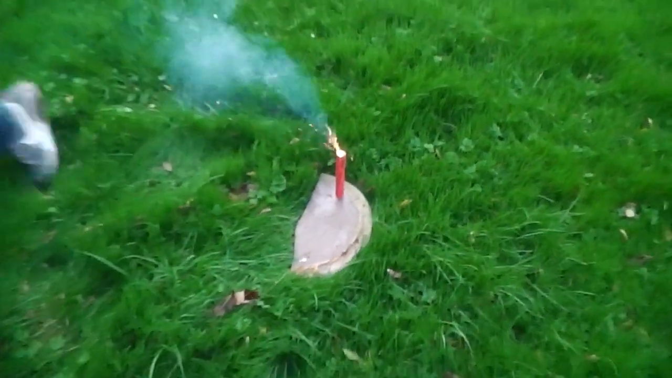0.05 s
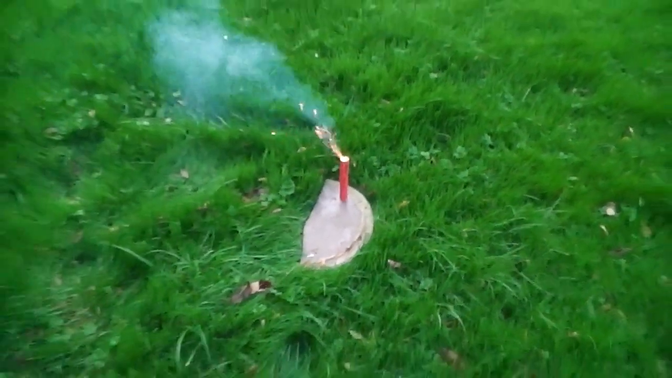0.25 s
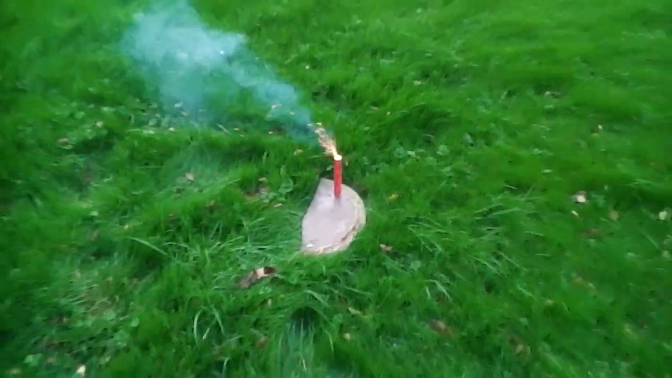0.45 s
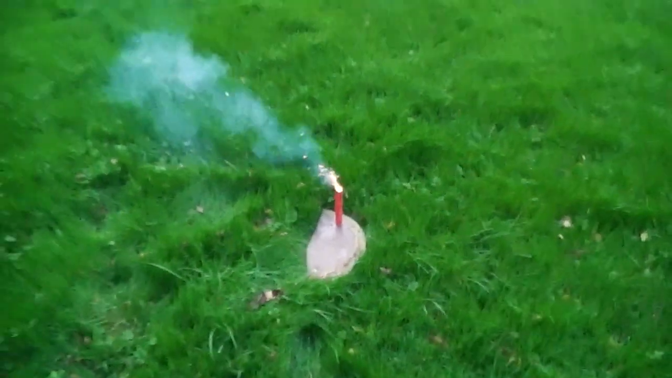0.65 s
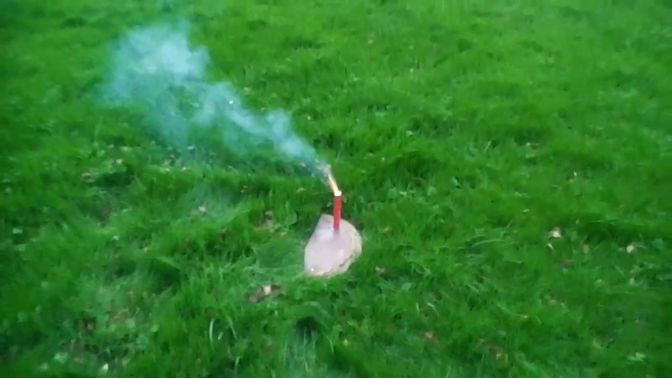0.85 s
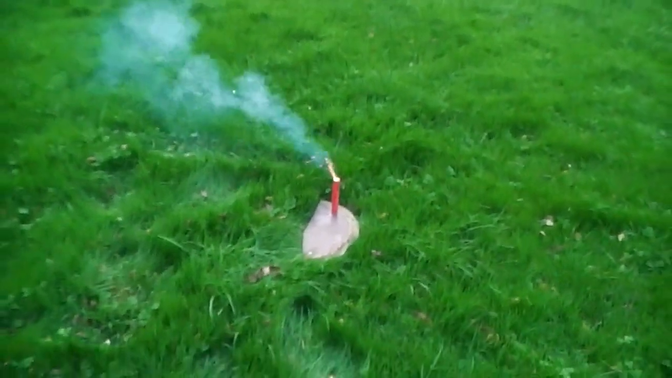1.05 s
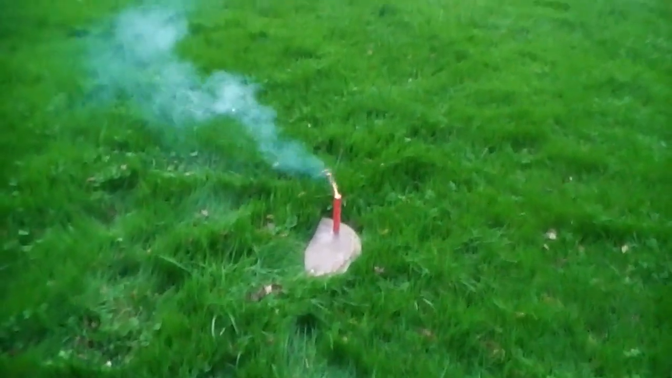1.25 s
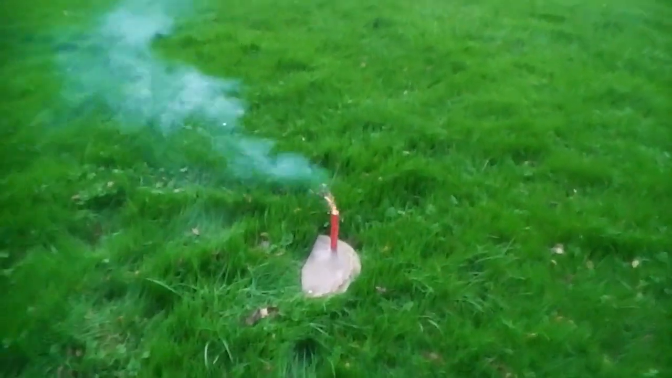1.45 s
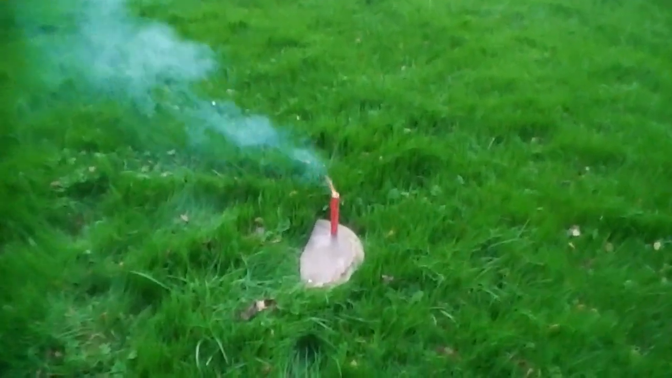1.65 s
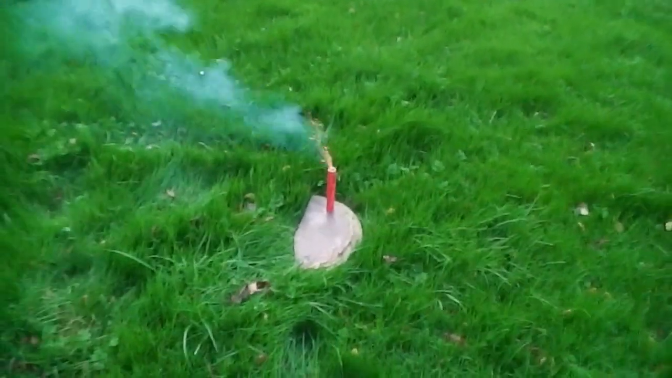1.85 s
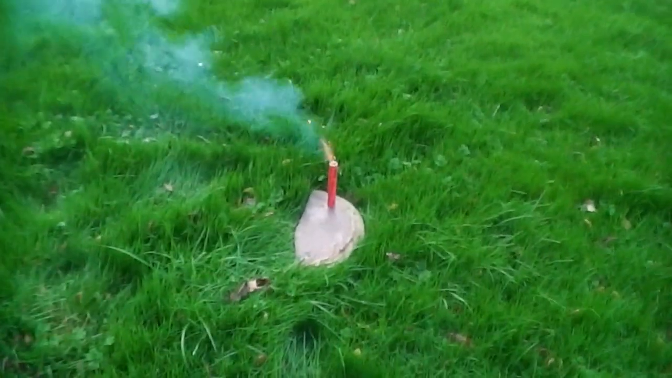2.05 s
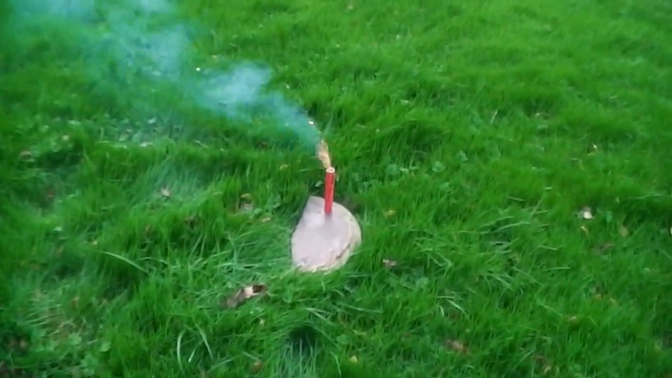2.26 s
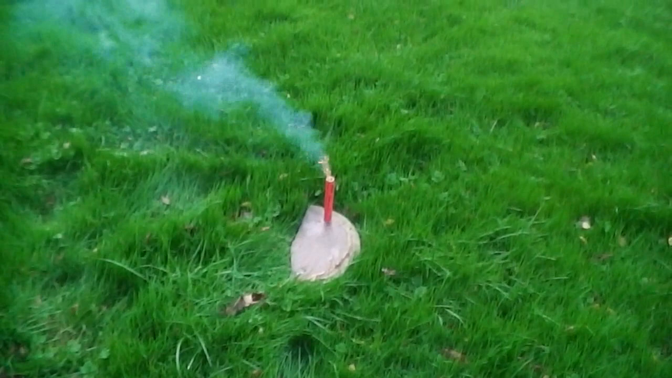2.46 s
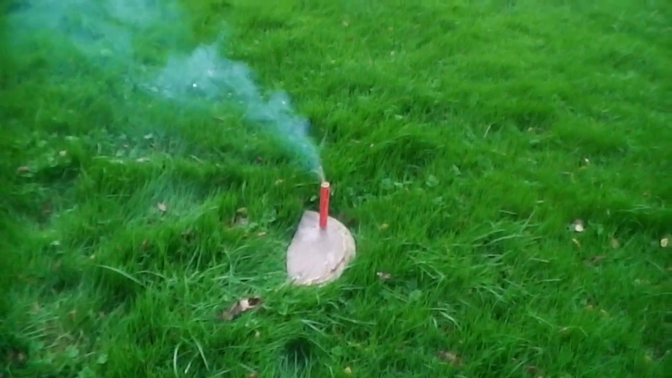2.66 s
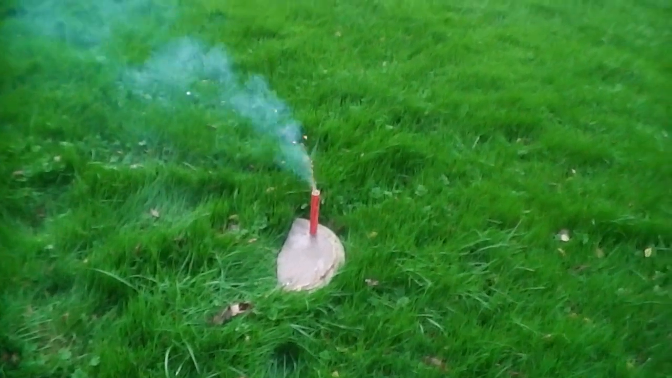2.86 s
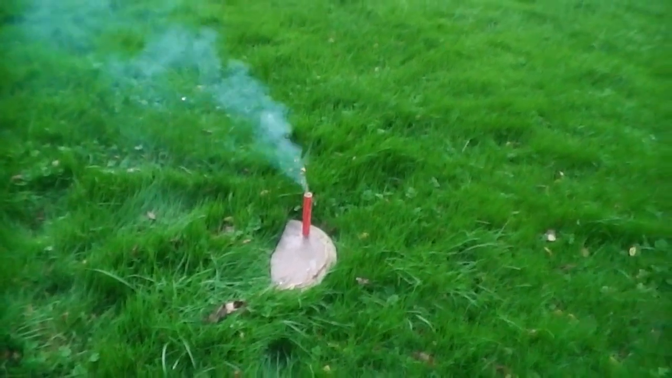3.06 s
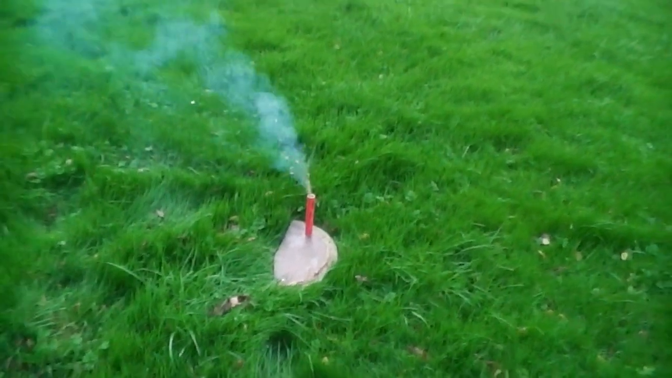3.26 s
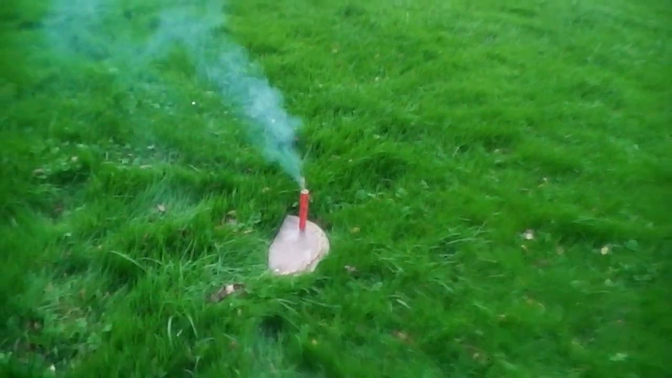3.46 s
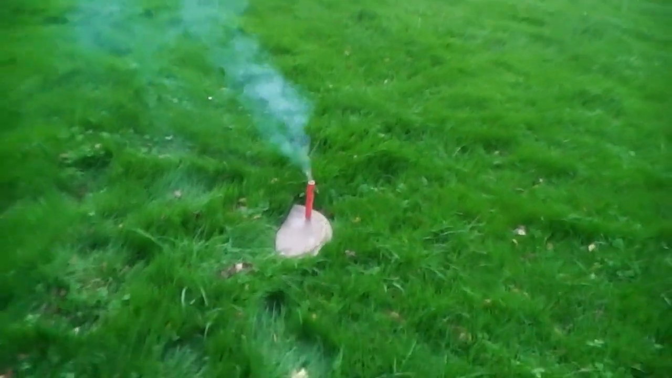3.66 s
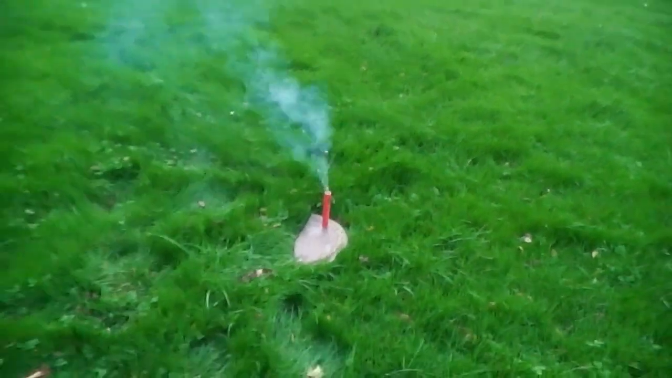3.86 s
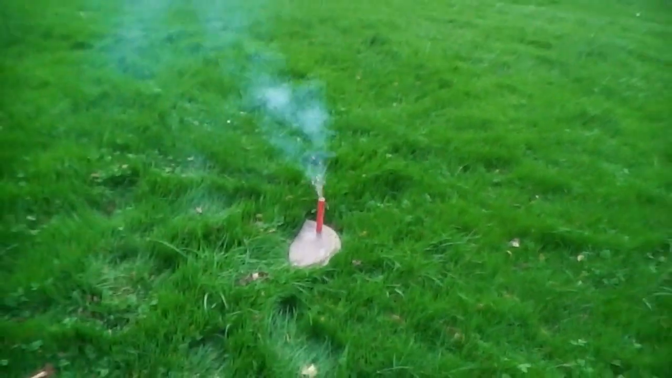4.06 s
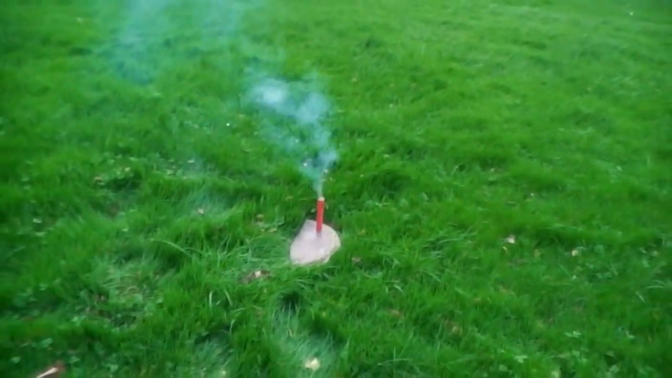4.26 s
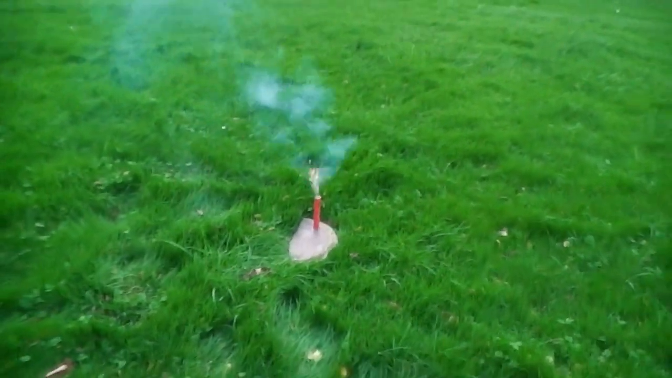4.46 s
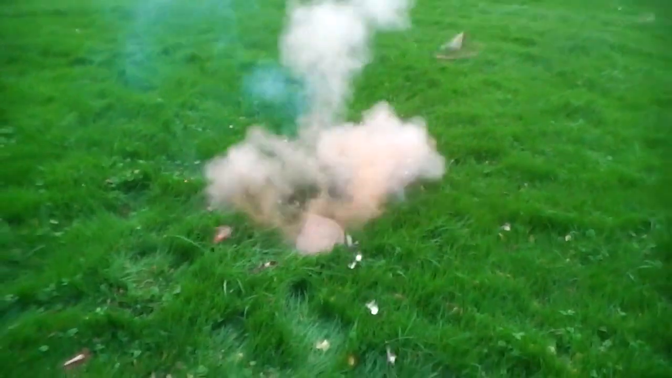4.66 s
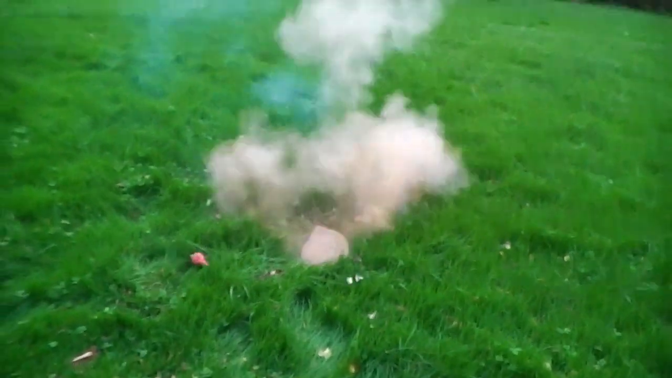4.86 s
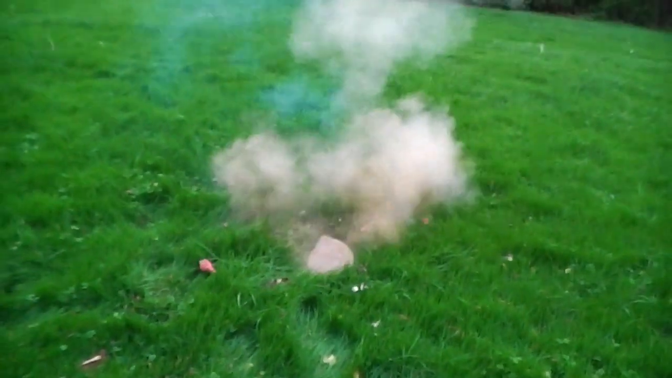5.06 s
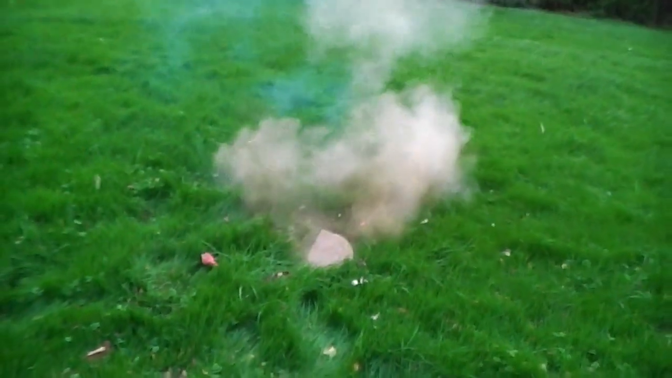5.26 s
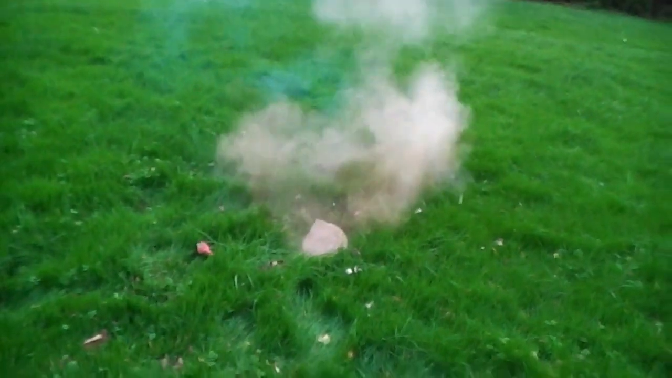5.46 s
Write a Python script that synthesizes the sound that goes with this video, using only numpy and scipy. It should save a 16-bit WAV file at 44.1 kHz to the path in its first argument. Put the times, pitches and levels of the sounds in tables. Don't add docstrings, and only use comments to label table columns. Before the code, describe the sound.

Outdoors on grass, a lit firecracker fuse hisses close to a handheld stereo microphone, bright and crackly with a hollow, shifting colour. Footsteps knock and rustle away at the start. The hiss slowly weakens, a sharp tick falls just before four seconds, then the hiss surges into one violent, very short bang. The level ducks at once; faint dull echoes and tiny debris knocks follow.

```python
import sys
import numpy as np
from scipy import signal
from scipy.fft import rfft, irfft, next_fast_len
from scipy.io import wavfile
from scipy.ndimage import uniform_filter1d

SR = 44100
rng = np.random.default_rng(int(sys.argv[2]) if len(sys.argv) > 2 else 0)


def level_to_linear(level):
    exponent = np.asarray(level, float) / 20
    return 10 ** exponent


def dump_mix(stems):
    frames = np.atleast_2d(stems).T
    limited = np.clip(frames, -1, 1)
    pcm = np.round(limited * 32767).astype(np.int16)
    wavfile.write(sys.argv[1], SR, pcm)


N = 243431
TIME = np.arange(N) / SR

# (time [s], jet level [dB], extra brightness [dB])
FUSE = [(0.0, -35, 2), (0.33, -32, -4), (0.5, -31, -3.5), (0.568, -27.5, -6), (0.592, -35.5, -2.5),
        (0.77, -29.5, -5.5), (1.1, -31, -2.5), (1.69, -35, 1.5), (1.8, -29, -1.5), (1.92, -35.5, 1.5),
        (2.4, -35, -1.5), (3.15, -38.5, -0.3), (3.35, -38, -1), (3.46, -41, -0.7), (3.71, -39, -1.4),
        (3.93, -43.5, -.4), (4.05, -42, -1), (4.38, -44, 0)]
# (time [s], spacing [Hz])
MIRROR = [(0, 1634), (.3, 1765), (.65, 1880), (1.0, 1965), (1.5, 1965), (2.6, 1926), (3.3, 1960),
          (3.75, 2055), (4.52, 2090)]
# (frequency [Hz], level [dB])
HISS = [(150, -13), (500, -18), (1200, -0.5), (2300, 0.5), (3000, -3.5), (4800, -5.5), (6500, -0.5),
        (9000, 1), (12000, 4), (14000, -1.5), (16500, -11)]
# (frequency [Hz], level [dB])
WIDTH = [(150, -8.5), (1200, -14), (2300, -22), (4000, -14.5), (5500, -13), (8500, -17), (11000, -18.5),
         (13500, -10), (16000, -19.5)]
# (frequency [Hz], width [Hz], level [dB])
JET = [
    (3830, 1890, 8),
    (3733, 1680, 10.5),
]
# (frequency [Hz], share mirrored above it [0-1])
MIRROR_DULL = (6200, .36)
# (start [s], top [s], gain control shuts [s], rise [dB], treble lead [dB], body lead [dB])
FLARE = (4.44, 4.500, 4.5068, 21.5, -3.5, 4)
FLARE_S, FLARE_TOP_S, SHUT_S, FLARE_RISE_DB, TREBLE_LEAD_DB, BODY_LEAD_DB = FLARE
STONE_HZ = 1110
CATCH_S, CATCH_DB, CATCH_TREBLE_DB = 4.39, 3.2, 2.2


def burning():
    fire = rng.standard_normal(N) + 0.44 * grains(per_s=1500, spread_db=3.5)
    side = colour(rng.standard_normal(N), WIDTH)
    fire = fire + level_to_linear(-15) * side * [[1], [-1]]
    sputter_db = 0.62 * drift(5.9) + 0.58 * drift(44)
    return colour(fire, HISS) * level_to_linear(sputter_db)


def mirrored(fire):
    spacing_hz, = in_time(MIRROR)
    dull_hz, kept = MIRROR_DULL
    image = kept * fire + (1 - kept) * band(fire, 100, dull_hz)
    image = signal.sosfilt(signal.butter(2, STONE_HZ, "high", fs=SR, output="sos"), image)
    late = TIME - 1 / spacing_hz
    share = .74 - .17 * np.maximum(TIME - 3.3, 0)
    return fire + share * np.array([np.interp(late, TIME, side) for side in image])


def fuse():
    jet_db, bright_db = in_time(FUSE)
    slow_db = uniform_filter1d(jet_db, int(0.39 * SR), mode="nearest")
    near = np.exp(-TIME / 0.32)
    body_db = slow_db + 0.22 * (jet_db - slow_db) - 13 - 0.32 * TIME + 8 * near
    treble_db = jet_db + bright_db + CATCH_TREBLE_DB * np.clip((TIME - CATCH_S) / 0.092, 0, 1)
    caught = np.clip((TIME - CATCH_S) / 0.0067, 0, 1)
    climb = np.clip((TIME - FLARE_S) / (FLARE_TOP_S - FLARE_S), 0, 1) ** 2.5
    cut_db = -np.clip((TIME - FLARE_TOP_S) * 900, 0, None) - np.clip((TIME - SHUT_S) * 9000, 0, 90)
    fire = mirrored(burning())
    jet = []
    for side, (hz, width_hz, ring_db) in zip(fire, JET):
        ring = resonate(resonate(side, hz, width_hz), hz, width_hz)
        jet.append(side + level_to_linear(ring_db) * ring)
    body = level_to_linear(body_db + 1.0 + BODY_LEAD_DB * climb) * rms_one(band(fire, 120, 3000))
    middle = level_to_linear(jet_db + 0.18) * rms_one(band(np.array(jet), 2810, 6400))
    treble = level_to_linear(treble_db + 1.0 + TREBLE_LEAD_DB * climb) * rms_one(band(fire, 6270, 21000))
    flare = level_to_linear(CATCH_DB * caught + FLARE_RISE_DB * climb + cut_db)
    return (body + middle + treble) * flare * pan(.2)[:, None]


# (time [s], peak level [dB], length [s], sign [+-1], left over right [dB])
BLAST = [
    (4.5008, -13, .0027, -1, 2),
    (4.5016, -13, .0007, -1, -1),
    (4.5026, -9, .0007, -1, -9),
    (4.5039, -8.5, .0008, -1, 5),
    (4.5046, -9, .00068, -1, 0),
    (4.5059, -5.5, .0009, 1, -.5),
    (4.4950, -30, .024, 1, -2),
]
# (dull level [dB], dull t60 [s], bright level [dB], bright t60 [s])
BLAST_TAIL = (-21.5, .078, -18, .026)
# (frequency [Hz], level [dB])
TAIL = [(120, -12), (350, 8), (700, 10.5), (1500, -10), (2300, -24), (4000, -43)]
# (frequency [Hz], level [dB])
TAIL_BRIGHT = [(2000, -2), (3300, 0), (6200, 0), (8000, -5), (11000, -3), (15800, -8)]


def blast():
    out = np.zeros((2, N))
    for s, peak_db, length_s, sign, pan_db in BLAST:
        front = sign * np.sin(np.linspace(0, 2 * np.pi, int(length_s * SR)))
        add(out, s, level_to_linear(peak_db) * pan(pan_db)[:, None] * front)
    dull_db, dull_t60, bright_db, bright_t60 = BLAST_TAIL
    age = np.maximum(TIME - BLAST[0][0], 0)
    dull = level_to_linear(dull_db - 60 * age / dull_t60) * colour(wide(hush, alike=0.43), TAIL)
    bright = level_to_linear(bright_db - 60 * age / bright_t60) * colour(wide(hush, alike=0.37), TAIL_BRIGHT)
    return out + (dull + bright) * (age > 0)


# (time [s], peak level [dB], pitch [Hz], t60 [s], crack against peak [dB])
DEBRIS = [(4.5608, -34, 1500, .02, -8), (4.5925, -36, 1000, .03, -8), (4.6288, -33.5, 290, .008, -6),
          (4.688, -40, 1000, .015, -12), (4.7078, -42, 700, .02, -12), (4.7592, -31.5, 1700, .004, -30),
          (4.7695, -35.5, 1000, .02, -5), (4.789, -42, 1900, .008, -28), (4.868, -44, 1600, .008, -26),
          (5.013, -41, 1500, .03, -30), (5.036, -39, 1500, .02, -28), (5.199, -35, 1700, .025, -30),
          (5.289, -38, 1200, .02, -14), (5.289, -50, 12500, .012, -9), (5.3055, -34, 1200, .02, -24),
          (5.310, -36, 1500, .02, -24), (5.348, -37, 1600, .03, -20), (5.366, -34, 1000, .01, -24),
          (5.3708, -27.5, 1400, .006, -34), (5.383, -33, 1300, .012, -18), (5.4745, -36, 1700, .02, -30),
          (5.5085, -31, 1800, .015, -26), (5.509, -40, 170, .04, -30)]


def debris(pan_db):
    out = np.zeros((2, N))
    for s, peak_db, hz, t60, crack_db in DEBRIS:
        add(out, s, knock(peak_db, hz, t60, crack_db) * pan(pan_db[int(s * SR)])[:, None])
    return out


# (time [s], level [dB], fade [dB/s])
ECHOES = [(4.53, -49.5, 83), (4.63, -53, 52), (4.76, -54, 118.5), (4.8, -58.5, 22), (5.03, -51, 27),
          (5.203, -52, 296), (5.23, -53.5, 7), (5.31, -49.5, 34), (5.377, -52, 132), (5.46, -66, 15),
          (5.52, -54, 90)]
# (frequency [Hz], level [dB])
FAR = [(180, -52), (300, -27), (525, -6), (721, -7.5), (1390, -2.5), (2120, -6), (2310, -12.5), (3000, -25),
       (3900, -64.5), (6600, -120)]
# (frequency [Hz], level [dB])
FAR_TREBLE = [(2400, -4), (3500, -0.5), (5000, -3.5), (7000, -18.5), (9000, -36.5), (12000, -65.5)]
# (frequency [Hz], level [dB])
FAR_RUMBLE = [(13, -76), (22, -39), (53, -19.5), (134, -1.5), (342, -7.5), (376, -8.5), (400, -8),
              (520, -43), (880, -120)]
# (frequency [Hz], level [dB])
AIR_COLOUR = [(3530, -40), (6000, -0.5), (7440, -5), (10800, -3.5), (11900, -5.5), (15800, -11.5)]


def aftermath():
    age = TIME - FLARE_TOP_S
    level_db = swells(ECHOES, rise_db_per_s=320.5)
    pan_db = -0.7 - 5.2 * age
    treble_db = -6.5 - 15 * age + 4.5
    far = colour(wide(lambda: hush() + .6 * grains(per_s=1200, spread_db=3.5), alike=.8), FAR)
    treble = colour(wide(hush, alike=0.49), FAR_TREBLE)
    rumble = colour(wide(hush, alike=0.8), FAR_RUMBLE)
    air = colour(wide(hush, alike=0.71), AIR_COLOUR)
    lumps = level_to_linear(2.0 * drift(60))
    out = lumps * (far * level_to_linear(2.0) + treble * level_to_linear(treble_db)) * level_to_linear(level_db) * pan(pan_db)

    back_db = -69 - 62 * np.maximum(5.28 - TIME, 0)
    thud_db = -52.5 - 60 * age
    lows = np.hypot(level_to_linear(level_db - 13), level_to_linear(thud_db))
    out = out + rumble * level_to_linear(2.0) * np.hypot(lows, level_to_linear(back_db + 3))

    back_db = back_db + 2.5 * drift(25)
    gated_db = back_db - 1.3 * np.maximum(-77 - back_db, 0)
    back = level_to_linear(gated_db) * np.clip((TIME - 5.0) / .05, 0, 1)
    for low_hz, high_hz in [(4000, 6500), (6500, 9000), (9000, 12000), (12000, 16500)]:
        fading = level_to_linear(-63 - 15 * high_hz / 1000 * np.maximum(TIME - 4.62, 0))
        sos = signal.butter(3, [low_hz, high_hz], "band", fs=SR, output="sos")
        out = out + signal.sosfilt(sos, air) * level_to_linear(4.5) * np.hypot(fading, back)
    after = np.clip((TIME - SHUT_S) / .04, 0, 1) ** 2
    return after * out + debris(pan_db)


# (time [s], level [dB], fade [dB/s])
STRIDES = [(.015, -34, 350), (.2, -52, 54), (.34, -41.5, 296), (.45, -42, 15), (.8, -41, 60),
           (.86, -46, 600), (1.3, -42, 80), (1.49, -41.5, 42), (2.24, -59, 6), (3.17, -54.5, 13),
           (3.5, -47, 34), (3.83, -45, 124), (4.2, -51.5, 47)]
# (frequency [Hz], level [dB])
GRASS = [(150, -27), (300, -7), (520, -1), (1000, -0.5), (1500, 1), (2100, -15)]
# (frequency [Hz], level [dB])
RUMBLE = [(13, -38.5), (22, -5.5), (60, -0.5), (210, -2.5), (242, -5), (294, -5.5), (350, -5), (460, -26),
          (770, -120)]
# (time [s], peak level [dB], pitch [Hz],
# t60 [s])
KNOCKS = [(.012, -20.5, 1290, 0.026), (.024, -28.5, 590, 0.041), (.082, -43, 201, 0.039),
          (0.332, -23, 1180, 0.082), (.384, -29, 1800, .015), (0.448, -43, 204, 0.038),
          (.493, -25, 1110, 0.091), (0.522, -28, 1240, 0.022), (.856, -27.5, 720, 0.02),
          (.984, -31, 816, 0.015), (1.057, -39, 290, 0.069), (1.098, -65, 318, 0.045),
          (1.133, -36.5, 337, 0.049), (3.8213, -21.5, 2050, 0.034), (3.8214, -18, 5700, 0.015),
          (3.822, -32.5, 810, 0.071), (4.26, -43, 420, 0.061), (4.397, -31, 2800, 0.009),
          (4.474, -60, 11000, .006), (4.5016, -0.5, 5760, 0.017), (4.5005, -6, 3320, 0.012)]


def lawn():
    walking = np.hypot(level_to_linear(-41.5 - 7.5 * TIME), level_to_linear(-53))
    strides = level_to_linear(swells(STRIDES, rise_db_per_s=147))
    rustle_db = 20 * np.log10(np.hypot(walking * level_to_linear(-0.5), strides)) - 1.5 + 1.5 * drift(14)
    rumble_db = -64.5 + 5 * np.exp(-((TIME - 0.68) / .5) ** 2) - .1 + 1.3 * drift(8)
    rustle = colour(wide(lambda: hush() + 0.44 * grains(per_s=400, spread_db=4.0), alike=0.86), GRASS)
    rumble = colour(wide(hush, alike=0.59), RUMBLE)
    out = (TIME < SHUT_S) * (rustle * level_to_linear(rustle_db) + rumble * level_to_linear(rumble_db))
    for s, peak_db, hz, t60 in KNOCKS:
        add(out, s, knock(peak_db, hz, t60, crack_db=-30.0) * np.ones((2, 1)))
    return out * pan(-1.2)[:, None]


def knock(peak_db, hz, t60, crack_db):
    age = np.arange(3000) / SR
    rattle, scratch = rng.standard_normal((2, len(age)))
    blow = 14 * (age == 0) + rattle * level_to_linear(-60 * age / t60)
    body = resonate(resonate(blow, hz, .7 * hz), hz, 1.4 * hz)
    soft = signal.butter(3, min(1.5 * hz, 15000), fs=SR, output="sos")
    body = signal.sosfilt(soft, body)
    crack = resonate(resonate(scratch, 4500, 6000), 4500, 9000) * level_to_linear(crack_db - 60 * age / .015)
    return level_to_linear(peak_db) * (body / np.abs(body).max() + crack)


def hush():
    return rng.standard_normal(N)


def grains(per_s, spread_db):
    sizes = level_to_linear(spread_db * np.minimum(rng.exponential(1, N), 5)) * rng.choice([-1, 1], N)
    return rms_one(sizes * (rng.random(N) < per_s / SR))


def drift(rate):
    r = np.exp(-80 * np.pi * rate / SR)
    slow = signal.lfilter([1], [1, -2 * r, r * r], rng.standard_normal(N // 40 + 2002))[2000:]
    return np.interp(np.arange(N) / 40, np.arange(len(slow)), rms_one(slow))


def swells(rows, rise_db_per_s):
    s, db, fade = np.transpose(rows)[:, :, None]
    age = TIME[::32] - s
    slope_db = np.where(age < 0, rise_db_per_s * age, -np.abs(fade) * age)
    power = level_to_linear(2 * (db + slope_db)).sum(axis=0)
    return np.interp(TIME, TIME[::32], 10 * np.log10(power + 1e-14))


def in_time(rows):
    s, *columns = np.transpose(rows)
    return [np.interp(TIME, s, c) for c in columns]


def colour(x, spectrum):
    hz, db = np.transpose(spectrum)
    size = next_fast_len(N)
    f = np.log(np.arange(1, size // 2 + 2) * SR / size)
    edges_hz = [hz[0] / 2, *hz, hz[-1] * 2]
    shape_db = np.interp(f, np.log(edges_hz), [db[0] - 30, *db, db[-1] - 30])
    return rms_one(irfft(rfft(x, size) * level_to_linear(shape_db), size)[..., :N])


def resonate(x, hz, width_hz):
    r = np.exp(-np.pi * width_hz / SR)
    poles = [1, -2 * r * np.cos(2 * np.pi * hz / SR), r * r]
    return signal.lfilter(np.array([1, 0, -1]) * (1 - r * r) / 2, poles, x)


def band(x, low_hz, high_hz):
    return signal.sosfiltfilt(signal.butter(2, [low_hz, high_hz], "band", fs=SR, output="sos"), x)


def rms_one(x):
    return x / np.sqrt(np.mean(x ** 2) + 1e-20)


def wide(make, alike):
    alike = np.clip(alike, 0, 1)
    shared = np.sqrt((1 + alike) / 2) * make()
    return shared + np.sqrt((1 - alike) / 2) * make() * [[1], [-1]]


def pan(db):
    return level_to_linear(np.array([db / 2, -db / 2]))


def add(out, s, piece):
    i = int(s * SR)
    out[:, i:i + piece.shape[1]] += piece[:, :N - i]


def scene():
    return fuse() + blast() + aftermath() + lawn()


def band_limit(x):
    return signal.sosfilt(signal.butter(12, 16040, fs=SR, output="sos"), x)


def record(dry):
    cut = signal.ellip(8, .5, 60, 15750, fs=SR, output="sos")
    rounded = 0.82 * np.tanh(dry / 0.81)
    return band_limit(signal.sosfilt(cut, rounded))


dry = scene()
out = record(dry)
dump_mix(out)
```